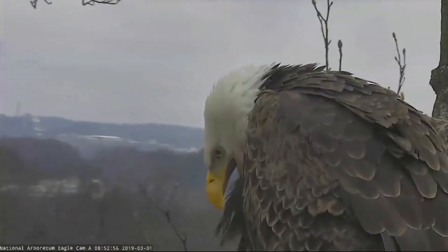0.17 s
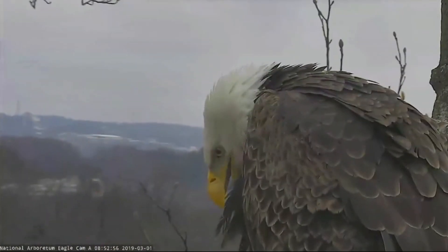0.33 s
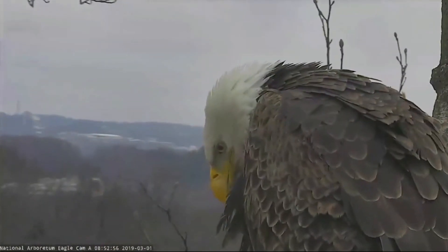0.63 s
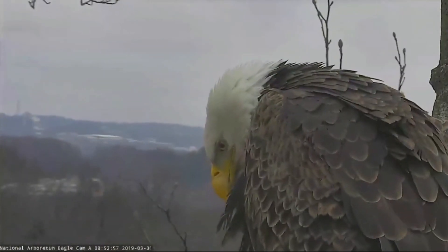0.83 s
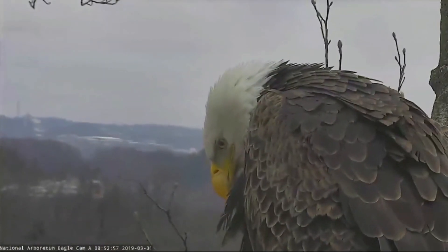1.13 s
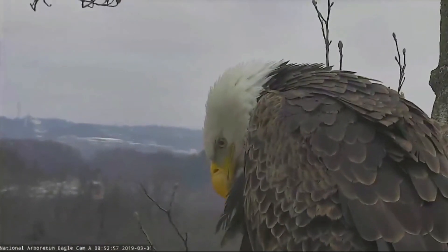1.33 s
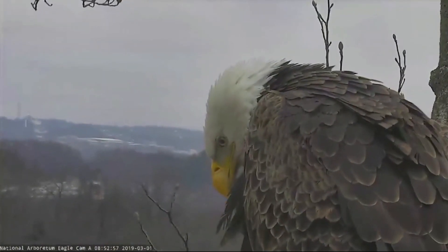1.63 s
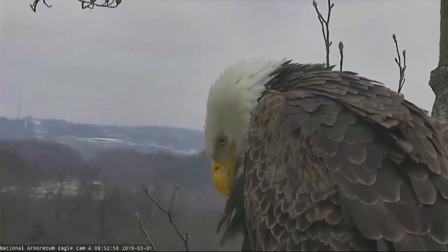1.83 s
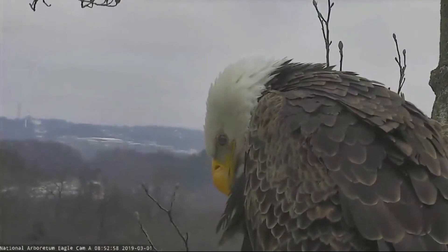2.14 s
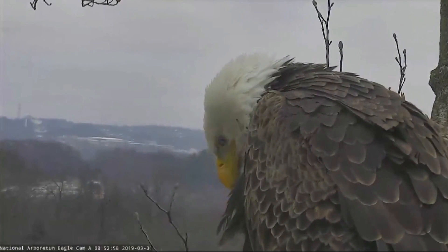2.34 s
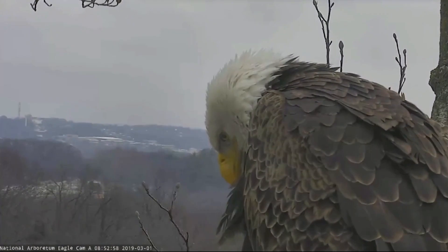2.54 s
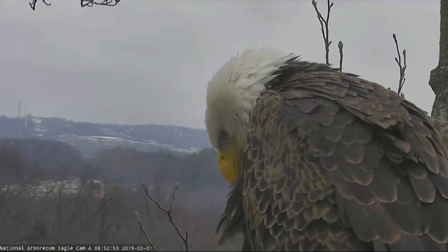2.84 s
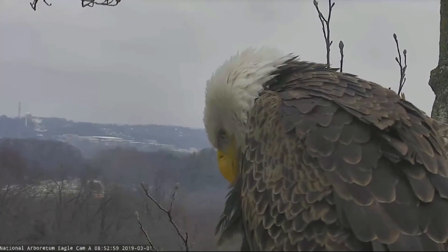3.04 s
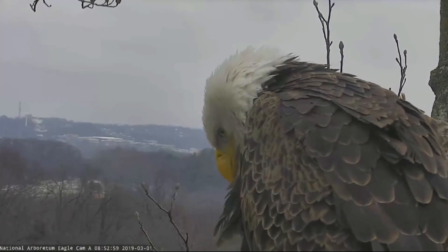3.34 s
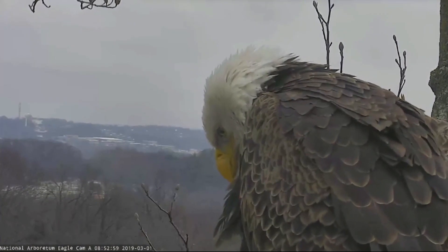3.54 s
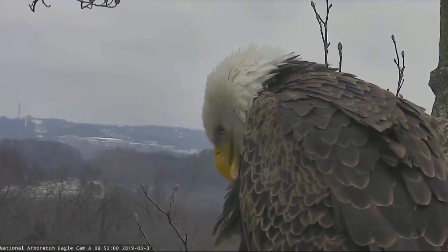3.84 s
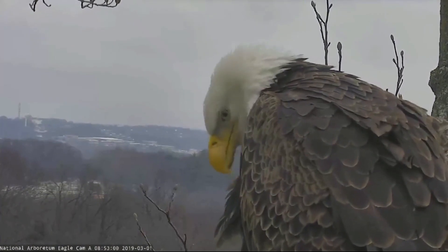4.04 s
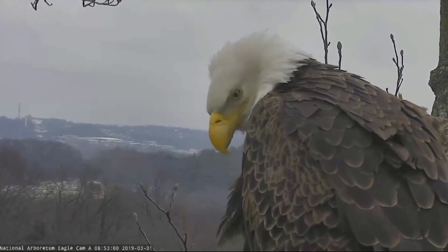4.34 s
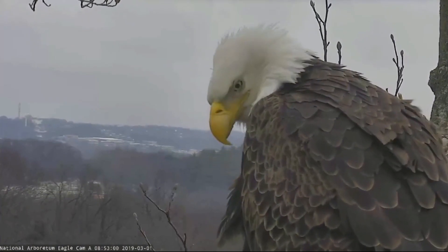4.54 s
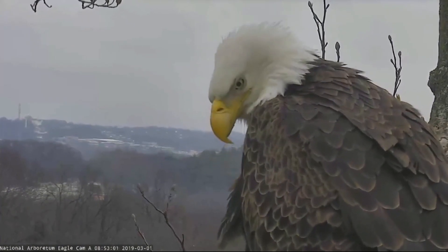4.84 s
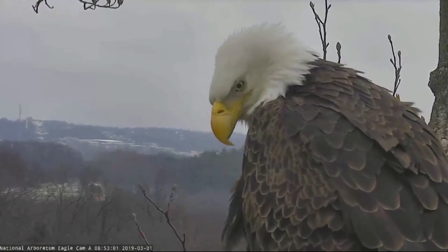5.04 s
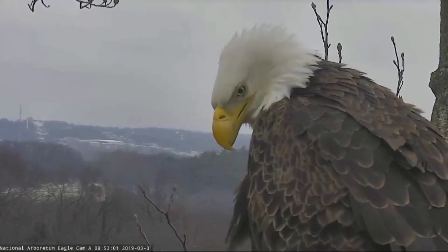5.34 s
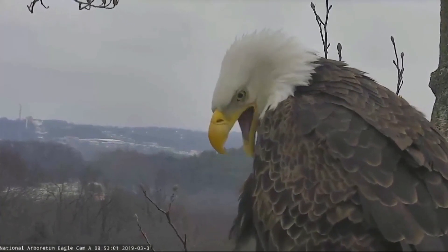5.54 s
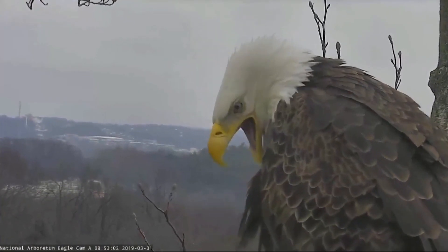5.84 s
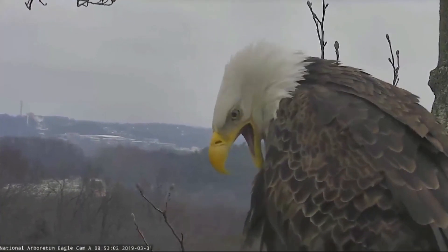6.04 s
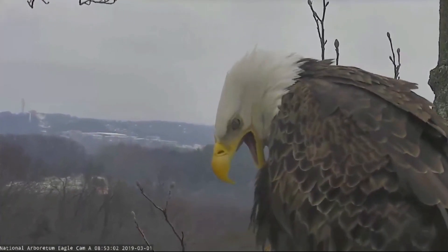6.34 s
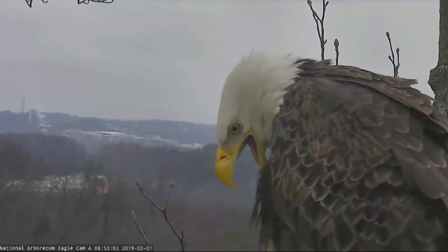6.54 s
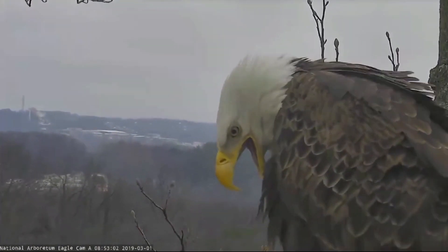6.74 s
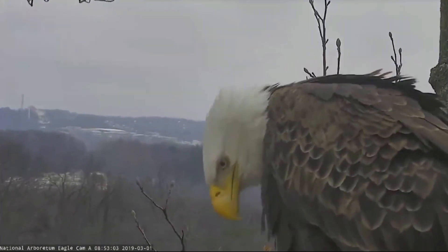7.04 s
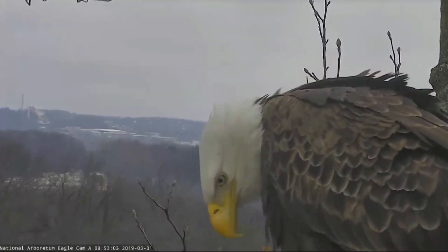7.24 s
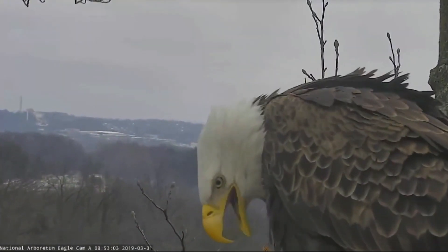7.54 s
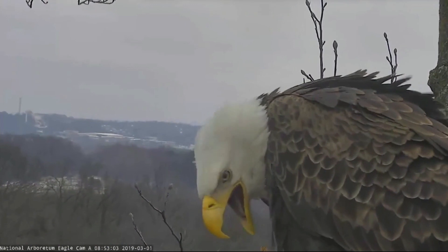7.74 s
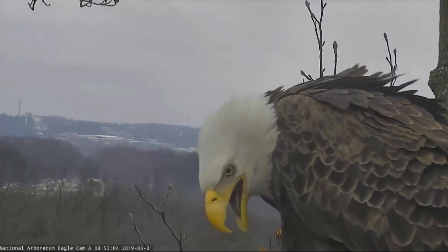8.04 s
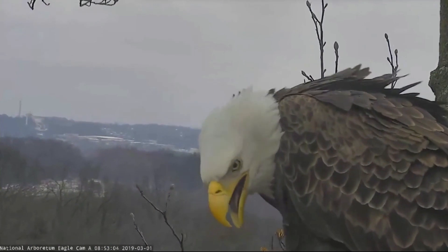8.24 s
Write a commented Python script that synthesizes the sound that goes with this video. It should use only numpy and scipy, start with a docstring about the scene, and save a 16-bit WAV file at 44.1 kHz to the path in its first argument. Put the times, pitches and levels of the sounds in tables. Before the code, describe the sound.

A large eagle preens quietly, feathers scratching and flicking, with hoarse ringing clucks and a distant songbird's falling whistles. Around three seconds it begins a rapid string of thin, rising, rough-edged cheeps. A few more follow at five seconds, then very brief, bright, piercing yelps dominate until two softer cheeps end it. Near outdoor microphone, faint traffic-like rush, hum and hiss, slowly freshening low wind, short woodland echo.

```python
"""Bald eagles call at a treetop nest, over a distant rush, a faint hum and hiss made from shaped noise and a sine.
A far bird's whistles (slow sine glides) come first, with ringing throaty clucks and a rustle of feathers (noise).
A puff of wind passes; thin cheeps, chips, whines and peeps (bending tones) then lead to a first short yelp.
More thin notes follow, then a run of loud falling yelps (tones with overtones), and two cheeps near the end.
Wind slowly freshens below it all, and delayed copies of the calls give the echo of the bare wood."""
import sys
import numpy as np
from scipy import signal
from scipy.fft import rfft, irfft, next_fast_len
from scipy.io import wavfile
from scipy.ndimage import map_coordinates

SR = 44100
rng = np.random.default_rng(int(sys.argv[2]) if len(sys.argv) > 2 else 0)


def waveform_to_disk(signal):
    """Save audio, clipped to [-1, 1], as 16-bit WAV at the path in sys.argv[1]."""
    frames = np.transpose(np.atleast_2d(signal))
    scaled = np.clip(frames, -1, 1) * 32767
    samples = np.round(scaled).astype(np.int16)
    wavfile.write(sys.argv[1], SR, samples)


N = 369999  # samples

# loud yelps: t/s, length/s, start f/Hz, end f/Hz, level/dB, then trims of the
# overtones: low ones (up to 2.5 times the pitch)/dB, middle ones (up to 3.5)/dB, treble/dB
YELP_NOTES = [(3.5035, .0175, 2600, 2400, -16, -28, -45, -42),
              (6.358, .0175, 2810, 2310, -11.6, -3.5, -2.5, -4),
              (6.751, .0255, 2940, 2410, -11.7, 3.5, 4.5, 4),
              (7.0362, .023, 2860, 2430, -11.4, 3.5, -13, 1),
              (7.253, .0255, 2590, 2480, -11.5, 1.5, -10, 0),
              (7.5842, .0135, 2620, 2350, -12.6, -16, -16, -16)]
# overtones of a yelp: multiple of the pitch, level/dB
YELP_OVERTONES = [(1.5, -35), (2, -16.5), (2.5, -40.5), (3, -25.5), (3.5, -47), (4, -35.5), (4.5, -55),
                  (5, -44)]
# colour of the air in a yelp: f/Hz, level/dB
YELP_AIR_COLOUR = [(1000, -36.5), (2500, 4), (4000, -3), (5200, 22.5), (6200, -15), (8000, -2), (10500, -9),
                   (13500, -17.5), (15500, -33.5)]
# cheeps: t/s, dive length/s, climb length/s, turning f/Hz, upward flick (share of pitch), level/dB, roughness
CHEEP_NOTES = [(3.103, 0, .044, 2560, .08, -30, .22), (3.205, .009, .031, 3500, .42, -28.5, .4),
               (3.288, .014, .038, 4450, .38, -41.5, .25), (3.655, .009, .022, 3620, .3, -32.5, .3),
               (3.934, .005, .038, 3850, .25, -39, .45), (4.020, .008, .021, 3450, .45, -32, .7),
               (4.105, .004, .016, 3400, .52, -34.5, .7), (4.175, .013, .015, 3720, .33, -34, .25),
               (4.259, .014, .015, 3750, .36, -32, .25), (5.022, 0, .040, 3330, .3, -29.5, .05),
               (5.124, .007, .038, 3640, .25, -29, .12), (5.205, .011, .030, 3650, .27, -29.5, .08),
               (8.119, 0, .053, 2450, .28, -32, .12), (8.238, 0, .047, 3380, .42, -33.5, .1)]
# rough plunging chips: t/s, length/s, start f/Hz, end f/Hz, level/dB, roughness
CHIP_NOTES = [(3.4445, .0105, 3800, 2800, -25, .7), (3.807, .017, 4200, 2650, -28, .9),
              (4.343, .021, 4400, 2900, -36, .55), (4.407, .009, 4200, 2000, -36.5, 1.6),
              (5.378, .022, 4400, 2400, -32, .8), (6.889, .019, 3550, 2300, -27.5, .35)]
# thin bending whines: t/s, length/s, start f/Hz, middle f/Hz, end f/Hz, level/dB
WHINE_NOTES = [(3.368, .029, 5350, 5650, 6200, -51), (3.434, .015, 5600, 5350, 4300, -44),
               (5.312, .076, 4100, 4950, 4050, -46), (6.268, .071, 4260, 4480, 3600, -37),
               (6.674, .068, 4170, 4500, 3700, -42), (6.971, .051, 4200, 4380, 3700, -43.5)]
# soft sagging peeps: t/s, length/s, start f/Hz, end f/Hz, level/dB
PEEP_NOTES = [(3.469, 0.025, 3930, 3060, -45), (3.486, 0.017, 2230, 1930, -42),
              (3.494, .011, 2080, 1870, -31), (3.498, 0.009, 3330, 3120, -30.5),
              (6.268, 0.034, 2377, 2190, -39.5), (6.298, 0.021, 3400, 3240, -42),
              (6.322, 0.018, 3420, 3060, -27.5), (6.337, 0.014, 3430, 3210, -33.5),
              (6.339, 0.016, 2420, 2380, -29.5), (6.912, 0.013, 2960, 2510, -32),
              (6.943, 0.0082, 4080, 3630, -47), (7.004, 0.0084, 1370, 1260, -45),
              (7.698, 0.019, 1700, 1470, -40.5)]
# colour of the thin voice: f/Hz, level/dB
BEAK_COLOUR = [(1500, 4.5), (3600, -3.5), (4200, -6.5), (5000, -11.5), (5600, -10.5), (6250, -33.5),
               (7600, -15), (9000, -9), (10000, -46), (15000, -29)]
# hoarse clucks: t/s, level/dB, time to fade by 60 dB/s
CLUCK_NOTES = [(0.288, -42.5, 0.49), (0.67, -47.5, 0.42), (1.502, -41, 0.3), (3.616, -32.5, 0.084),
               (3.636, -45.5, 0.54), (5.37, -43, 0.13), (5.478, -38.5, 0.25), (6.171, -36, 0.24),
               (6.277, -44, 0.44), (6.947, -38.5, 0.2), (6.995, -39.5, 0.28), (7.692, -40.5, 0.39),
               (7.762, -44.5, 0.53), (8.054, -45, 0.47)]
# resonances of the throat: f/Hz, width/Hz, level/dB
THROAT_RESONANCES = [(1153, 230, -0.5), (1683, 1430, -2.5), (1880, 290, -9), (2450, 310, 0.5)]
# throat pops that come with some clucks: t/s, level/dB
THROAT_POPS = [(0.2918, -49), (1.501, -38), (3.6167, -25.5), (6.174, -37.5)]
# tones that ring in a pop: f/Hz, level/dB, time to fade by 60 dB/s
POP_TONES = [(1350, -17.5, .03), (1967, -3, 0.035), (2422, -0.5, .06)]
# preening strokes: middle t/s, length/s, level/dB
PREENING_STROKES = [(0.983, 0.52, -51.5), (1.226, 0.15, -52.5), (1.362, 0.103, -54.5), (1.677, 1, -52)]
# feather flicks: t/s, level/dB
FEATHER_FLICKS = [(.7502, -47), (0.766, -43.5), (1.077, -45), (1.1753, -48), (1.186, -43), (1.2048, -36.5),
                  (1.226, -40), (1.244, -45), (1.5599, -45), (1.5988, -45), (1.711, -42), (1.809, -45),
                  (1.8453, -40), (1.8976, -39.5), (2.0412, -37.5)]
# colour of sliding feathers: f/Hz, level/dB
SLIDE_COLOUR = [(600, -15), (1300, 9), (1900, 10.5), (2500, 21.5), (3400, 10.5), (4500, -6), (6000, -15),
                (8000, -28), (10000, -48), (15000, -52)]
# colour of a feather flick: f/Hz, level/dB
FLICK_COLOUR = [(600, -14), (1300, 14.5), (1900, 11.5), (2500, 26.5), (3400, 13.5), (4500, -0.5),
                (6000, -10.5), (8200, -14), (10500, -36), (15000, -47)]
# far whistles: t/s, start f/Hz, end f/Hz, level/dB
FAR_WHISTLES = [(.05, 3820, 3420, -64.5), (.44, 4080, 4100, -72.5), (.72, 3740, 3420, -60.5),
                (1.47, 3780, 3380, -60.5), (2.23, 3790, 3340, -60.5), (2.241, 2820, 2510, -58),
                (3.67, 3790, 3320, -61), (7.45, 3780, 3450, -61.5)]
# strength of the echo, weaker while the head is bowed against the breast: t/s, level/dB
ECHO_LEVEL = [(3.5, -6), (4.5, 1.5), (8.39, 0.5)]
# how long the surrounding trees ring: f/Hz, time to fade by 60 dB/s
TREE_FADE = [(500, .5), (2600, 1), (5000, 0.22), (10000, 0.089)]
# strength of the distant rush: t/s, level/dB
RUSH_LEVEL = [(0.0, -51), (1.59, -50), (2.08, -52), (8.39, -49)]
# colour of the distant rush: f/Hz, level/dB
RUSH_COLOUR = [(20, -31.5), (60, -6.5), (110, -4), (160, -3.5), (280, -4), (370, -5), (430, -2.5),
               (515, -1.5), (600, -6), (900, -6.5), (1280, -6.5), (1900, -15.5), (2470, -7.5), (4200, -100)]
# colour of the microphone's hiss: f/Hz, level/dB
HISS_COLOUR = [(1500, -72.5), (2000, -25), (2450, -1), (3000, -7), (3700, -12.5), (4500, -26), (6000, -38),
               (9000, -47.5), (13800, -44), (15500, -52)]
# colour of the wind: f/Hz, level/dB
BREEZE_COLOUR = [(15, -17.0), (45, -8.0), (80, -6.5), (160, -28.5), (400, -72.5)]

LEAD_S, LAG_S = .006, .002  # a yelp stirs this early and lingers this long
RISE_S, GROWTH_S, FALL_S = .0019, .00105, .011  # a yelp's time to half strength, growth time and release
CLASH_S = .0038  # the membranes start to clash, adding overtones, this long into a yelp
DIVE_HZ_PER_S = 38000  # how fast a cheep falls to its turning pitch
REST_HZ, CREEP_HZ = 3850, 250  # it creeps up to the membrane's resting pitch, by at least CREEP_HZ
CATCH_HZ = 700  # dip in pitch where a note of roughness 1 catches
FLICK_FROM, FLICK_BEND = .5, 1.6  # share of the climb where the flick starts; its curvature
FLUTTER = .09  # pitch scatter of a note of roughness 1 (share of pitch)
CHIP_EDGE_S, WHINE_EDGE_S = .0025, .004  # fade at each end
WHINE_MIDDLE = .48  # place of the middle pitch (share of the length)
CREAK_PER_S, ONSET_S = 700, .001  # typical rate of a cluck's irregular pulses; attack time
CRACKLE_PER_S = 45  # average rate at which barbs catch during a stroke
WHISTLE_S, WHISTLE_RISE_S, WHISTLE_FALL_S = 0.34, 0.1, 0.12  # length, attack and release
BOUNCE_S, BOUNCE_DB = .0046, -17  # first reflection off the nest
BREEZE_DB, BREEZE_DB_PER_S = -70, 1.13  # wind at the start; how fast it freshens
GUST_S, GUST_LENGTH_S, GUST_DB = 2.9, 0.17, 11  # one stronger puff
TOP_HZ = 15650  # the microphone's upper limit


def amp(db):
    """Turn decibels into a plain gain."""
    return 10 ** (np.asarray(db) / 20)


def unit(x):
    """Scale to an average strength (rms) of 1."""
    return x / np.sqrt(np.mean(x ** 2) + 1e-20)


def along(points, hz):
    """Read a (frequency, value) table at hz, on a log frequency axis."""
    f, v = np.transpose(points)
    return np.interp(np.log(hz + 1), np.log(f + 1), v)


def curve(rows):
    """Turn a (time, dB) table into a gain for each sample."""
    return amp(np.interp(np.arange(N) / SR, *np.transpose(rows)))


def clock(length):
    """Give the sample times of a short sound."""
    return np.arange(int(length * SR)) / SR


def wobble(t, rate):
    """Draw a smooth random curve with rate random points a second."""
    return map_coordinates(rng.standard_normal(int(t[-1] * rate) + 4), [t * rate])


def glide(hz):
    """Add up a changing pitch into the running phase of a tone."""
    return 2 * np.pi * np.cumsum(hz) / SR


def filtered(x, response):
    """Multiply the spectrum of x by a function of frequency."""
    m = next_fast_len(N + SR // 2)
    return irfft(rfft(x, m) * response(np.fft.rfftfreq(m, 1 / SR)), m)[:N]


def noise(colour):
    """Make noise of rms 1 with the given colour."""
    return unit(filtered(rng.standard_normal(N), lambda hz: amp(along(colour, hz))))


def add(track, s, sound):
    """Mix a sound into the track at time s."""
    part = track[round(s * SR):][:len(sound)]
    part += sound[:len(part)]


def swell(t, length, rise, fall):
    """Shape a plateau with a rounded rise and fall."""
    attack = np.sin(np.pi / 2 * np.clip(t / rise, 0, 1)) ** 2
    return attack * np.sin(np.pi / 2 * np.clip((length - t) / fall, 0, 1))


def yelps(droop_hz=60, sag_db=3, sub_db=-16, sub_fade_db=15, jitter=0.007,
          rasp_db=-30, shimmer_db=2.0, easing=0.77, bloom=1.7):
    """The voice box drops in pitch; overtones and rasp bloom under pressure, with a half-pitch tone at the onset."""
    out, air = np.zeros(N), np.zeros(N)
    for s, length, start_hz, end_hz, db, low_db, middle_db, treble_db in YELP_NOTES:
        span = length + LEAD_S + LAG_S
        t = clock(span)
        u = np.clip((t - LEAD_S) / length, 0, 1)
        hz = start_hz + (end_hz - start_hz) * u ** easing
        hz = hz - droop_hz * u ** 8  # pitch droops as pressure gives out
        phase = glide(hz * (1 + jitter * wobble(t, 1200)))
        # the oscillation builds up, then levels off
        growth = 1 / (1 + np.exp((LEAD_S + RISE_S - t) / GROWTH_S))
        force = growth * swell(t, span, LEAD_S / 2, FALL_S)
        overtones = 0
        for k, level in YELP_OVERTONES:
            trim = low_db if k <= 2.5 else middle_db if k <= 3.5 else treble_db
            strength = amp(trim + level + shimmer_db * wobble(t, 400)) * force ** (bloom * k / 2)
            overtones = overtones + strength * np.cos(k * phase)
        overtones = overtones / (1 + np.exp((LEAD_S + CLASH_S - t) / (GROWTH_S / 2)))
        half_pitch = amp(sub_db + low_db / 10 - sub_fade_db * u) * np.sin(phase / 2)
        half_pitch *= swell(t, span, LEAD_S + 2 * RISE_S, FALL_S)
        add(out, s - LEAD_S, amp(db - sag_db * u) * (force * np.sin(phase) + overtones + half_pitch))
        puffs = force ** 2 * (1 + np.cos(phase) / 2)  # air escapes once a cycle
        add(air, s - LEAD_S, amp(db + rasp_db + treble_db) * puffs)
    return out + air * noise(YELP_AIR_COLOUR)


def squeak(t, hz, rough, flutter_db=5, shimmer_db=3.0, second_db=-18, buzz_db=4, edge=0.00042):
    """The thin voice follows a pitch path; in rough notes the membrane flutters."""
    phase = glide(hz * (1 + FLUTTER * rough * wobble(t, 1200)))
    tight_db = np.interp(np.median(hz), [3200, 3900], [-13, 0])  # a tighter membrane adds a buzzing octave
    octave_db = second_db + tight_db + along(BEAK_COLOUR, 2 * hz) + buzz_db * wobble(t, 1100)
    tone = amp(along(BEAK_COLOUR, hz)) * np.sin(phase) + amp(octave_db) * np.sin(2 * phase)
    # uneven strength within the note
    flutter = unit(amp((shimmer_db + rough * flutter_db) * np.tanh(wobble(t, 600))))
    return flutter * swell(t, t[-1], edge, edge) * tone


def cheeps(grow_db=3.5, fade_db=14, hold=0.71, crescendo_db=3, accent_db=7, catch_s=0.0012, soft_s=0.002):
    """A note may dive first; it catches, swells as it creeps up, then flicks higher as the air runs out."""
    out = np.zeros(N)
    for s, dive, climb, low_hz, flick, db, rough in CHEEP_NOTES:
        t = clock(dive + climb)
        early = np.maximum(dive - t, 0)  # time left in the dive
        late = np.clip((t - dive) / climb, 0, 1)  # share of the climb done
        hz = low_hz + DIVE_HZ_PER_S * early + max(REST_HZ - low_hz, CREEP_HZ) * late
        hz = hz * (1 + flick * np.maximum((late - FLICK_FROM) / (1 - FLICK_FROM), 0) ** FLICK_BEND)
        snag = rough * np.exp(-((t - dive) / catch_s) ** 2)
        hz = hz - CATCH_HZ * snag
        catch_db = accent_db * (snag - rough / 2)
        smooth = (1 - rough) ** 2
        effort_db = np.interp(late, [0, hold * smooth, 1], [-crescendo_db * smooth, 0, -fade_db])
        dive_db = -grow_db * (early / (dive + soft_s)) ** 2
        pressure = amp(db + catch_db + effort_db + dive_db)
        add(out, s, pressure * swell(t, dive + climb, soft_s, soft_s) * squeak(t, hz, rough))
    return out


def chips(taper_db=7, strongest=0.64, plunge=0.99):
    """Short rough notes plunge in pitch, with most pressure just past the middle."""
    out = np.zeros(N)
    for s, length, start_hz, end_hz, db, rough in CHIP_NOTES:
        t = clock(length)
        u = t / length
        hz = start_hz + (end_hz - start_hz) * u ** plunge
        pressure = amp(db - taper_db * (2 * (u - strongest)) ** 2)
        add(out, s, pressure * swell(t, length, CHIP_EDGE_S, CHIP_EDGE_S) * squeak(t, hz, rough))
    return out


def whines(gain_db=-1, taper_db=2):
    """Faint, nearly clean notes bend through a middle pitch on two smooth curves."""
    out = np.zeros(N)
    for s, length, start_hz, middle_hz, end_hz, db in WHINE_NOTES:
        t = clock(length)
        u = t / length
        before = np.maximum(1 - u / WHINE_MIDDLE, 0) ** 2
        after = np.maximum((u - WHINE_MIDDLE) / (1 - WHINE_MIDDLE), 0) ** 2
        hz = middle_hz - (middle_hz - start_hz) * before - (middle_hz - end_hz) * after
        pressure = amp(db + gain_db - taper_db * (2 * u - 1) ** 2)
        add(out, s, pressure * swell(t, length, WHINE_EDGE_S, WHINE_EDGE_S) * squeak(t, hz, rough=.04))
    return out


def peeps(taper_db=9):
    """Soft notes swell, sag in pitch and fade."""
    out = np.zeros(N)
    for s, length, start_hz, end_hz, db in PEEP_NOTES:
        t = clock(length)
        u = t / length
        hz = start_hz + (end_hz - start_hz) * u
        add(out, s, amp(db - taper_db * (2 * u - 1) ** 2) * squeak(t, hz, rough=0.11))
    return out


def throat(f, dull_hz=2850):
    """The throat strengthens sound near its resonances and dulls the treble."""
    total = 0
    for k, (centre, width, db) in enumerate(THROAT_RESONANCES):
        resonance = 1j * f * width / (centre * centre - f * f + 1j * f * width)
        total = total + (-1) ** k * amp(db) * resonance  # neighbours have opposite signs
    return total / (1 + (f / dull_hz) ** 12)


def clucks(rasp_db=1.5):
    """Irregular pulses and a little air ring the throat's resonances."""
    rate = CREAK_PER_S * np.exp(wobble(np.arange(N) / SR, 300) / 2)
    pulses = np.diff(np.floor(np.cumsum(rate) / SR), prepend=0)  # a click at each whole count
    voice = unit(filtered(unit(pulses) + rng.standard_normal(N) / 2, throat))
    force, t = np.zeros(N), clock(0.3)
    for s, db, t60 in CLUCK_NOTES:
        add(force, s, amp(db - 60 * t / t60 + rasp_db * wobble(t, 250)) * (1 - np.exp(-t / ONSET_S)))
    return force * voice


def pops(waver=.05):
    """The throat opens abruptly and rings for a moment."""
    out, t = np.zeros(N), clock(.08)
    for s, db in THROAT_POPS:
        ring = 0
        for hz, level, t60 in POP_TONES:
            tone = np.sin(glide(hz * (1 + waver * wobble(t, 460))))
            ring = ring + amp(db + level - 60 * t / t60) * tone
        add(out, s, (1 - np.exp(-2 * t / ONSET_S)) * ring)
    return out


def feathers(flick_t60=0.035, grain_db=2.0, crackle_db=5):
    """Feathers slide in swelling strokes full of small catches; barbs let go in sharper flicks."""
    slide, snap = np.zeros(N), np.zeros(N)
    for s, length, db in PREENING_STROKES:
        t = clock(length)
        grain = unit(amp(grain_db * wobble(t, 199.6)))
        add(slide, s - length / 2, amp(db) * np.sin(np.pi * t / length) * grain)
    t = clock(.1)
    burst = amp(-60 * t / flick_t60) * (1 - np.exp(-2 * t / ONSET_S))
    for s, db in FEATHER_FLICKS:
        add(snap, s, amp(db) * burst)
    catches = amp(crackle_db) * slide * (rng.random(N) < CRACKLE_PER_S / SR)
    snap += signal.fftconvolve(catches, burst)[:N]  # a small burst at each catch
    return slide * noise(SLIDE_COLOUR) + snap * noise(FLICK_COLOUR)


def songbird(bend=0.87):
    """Slow, mostly falling whistles waver after their long way through the trees."""
    out, t = np.zeros(N), clock(WHISTLE_S)
    shape = swell(t, WHISTLE_S, WHISTLE_RISE_S, WHISTLE_FALL_S)
    for s, start_hz, end_hz, db in FAR_WHISTLES:
        hz = start_hz + (end_hz - start_hz) * (t / WHISTLE_S) ** bend + 40 * wobble(t, 200)
        add(out, s, amp(db + 2.5 * wobble(t, 60)) * shape * np.sin(glide(hz)))
    return out


def echoes(x, near_db=-17.5, near_t60=0.16, far_db=-26.5, dull_hz=3800, treble_db=-28):
    """Nest and limbs answer quickly; the surrounding trees give a faint, dull tail."""
    # noise that fades at a different speed at each frequency
    hz, t, z = signal.stft(rng.standard_normal(SR), SR, nperseg=256)
    fading = z * amp(-60 * t / along(TREE_FADE, hz)[:, None])
    far = signal.istft(fading, SR, nperseg=256)[1][:SR]
    t = clock(1)
    limbs = rng.random(SR) < 600 / SR  # separate reflections, about 600 a second
    near = limbs * rng.standard_normal(SR) * amp(-60 * t / near_t60) * (t > .012)  # nearest limb's delay/s
    answer = amp(near_db) * near / np.linalg.norm(near)
    answer = answer + amp(far_db) * far * (t > .015) / np.linalg.norm(far)
    bounce = filtered(x, lambda f: amp(BOUNCE_DB) * np.exp(-2j * np.pi * f * BOUNCE_S))
    reply = signal.fftconvolve(x, answer)[:N]
    return bounce + filtered(reply, lambda f: amp(treble_db) + 1 / (1 + (f / dull_hz) ** 10))


def background(rush_db=1.5, hiss_db=-57, hum_db=-64):
    """Distant traffic gives a rush of noise and a faint wavering hum, under the microphone's hiss."""
    t = np.arange(N) / SR
    rush = curve(RUSH_LEVEL) * amp(rush_db + 0.22 * wobble(t, 1.4)) * noise(RUSH_COLOUR)
    hum_hz = 434 + 3 * wobble(t, 12)
    hum = amp(hum_db + 1.1 * wobble(t, 4.7)) * np.sin(glide(hum_hz))
    return rush + hum + amp(hiss_db) * noise(HISS_COLOUR)


def breeze(unsteady_db=2.0):
    """Light air rumbles on the microphone's housing and slowly freshens."""
    t = np.arange(N) / SR
    gust_db = GUST_DB * np.exp(-((t - GUST_S) / GUST_LENGTH_S) ** 2)
    strength = amp(BREEZE_DB + BREEZE_DB_PER_S * t + gust_db + unsteady_db * wobble(t, 6.3))
    return strength * noise(BREEZE_COLOUR)


def scene():
    """Add the eagles' calls, their echoes and the surroundings at one microphone."""
    calls = yelps() + cheeps() + chips() + whines() + peeps() + clucks() + pops()
    wood = echoes(calls * curve(ECHO_LEVEL))
    return (calls + wood + feathers() + songbird() + background() + breeze())[None]


def record(dry):
    """The microphone passes only sound below its upper limit."""
    return filtered(dry[0], lambda hz: hz < TOP_HZ)[None]


dry = scene()
out = record(dry)
waveform_to_disk(out)
```